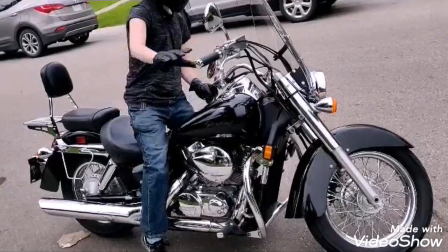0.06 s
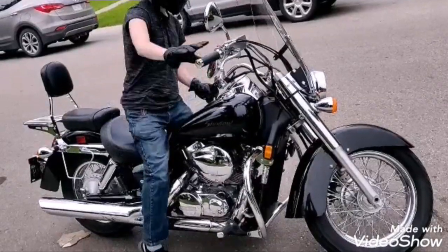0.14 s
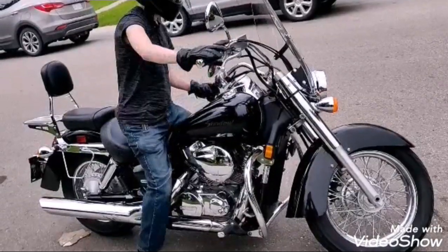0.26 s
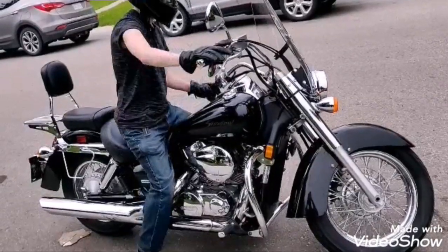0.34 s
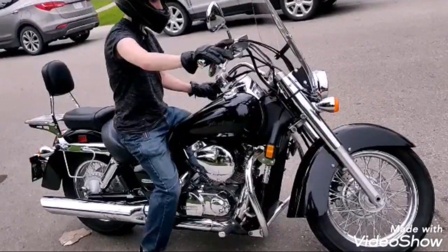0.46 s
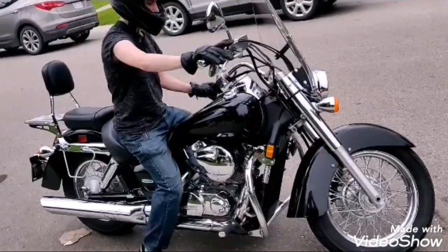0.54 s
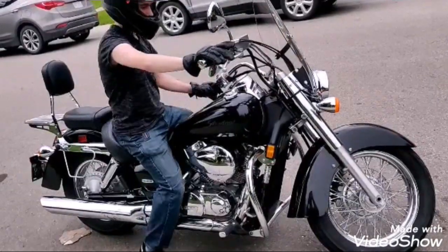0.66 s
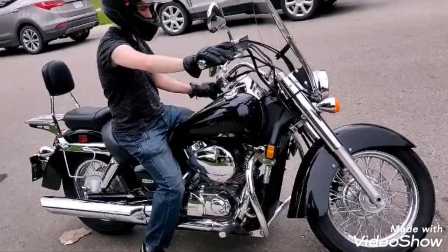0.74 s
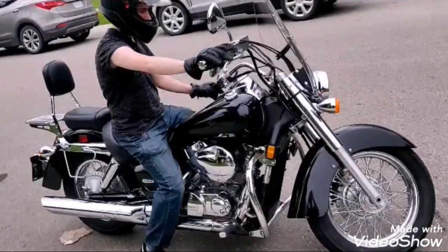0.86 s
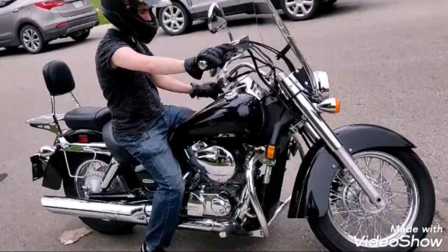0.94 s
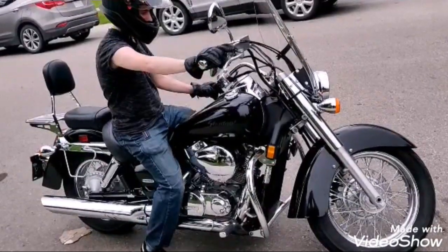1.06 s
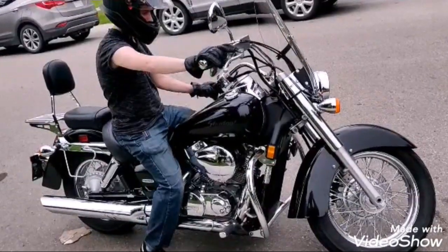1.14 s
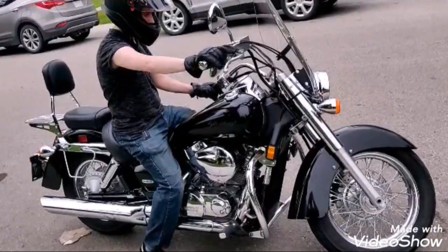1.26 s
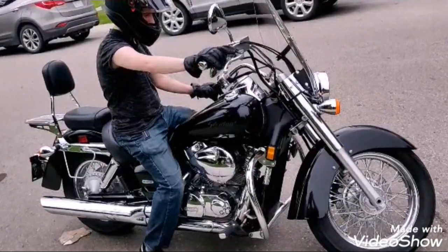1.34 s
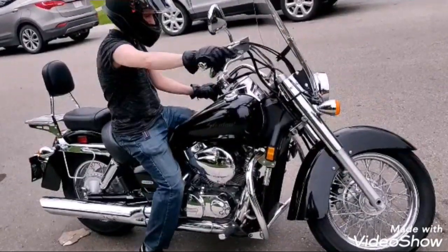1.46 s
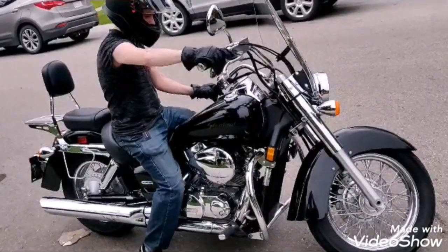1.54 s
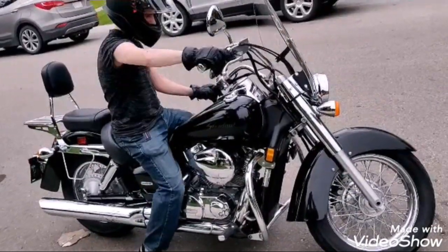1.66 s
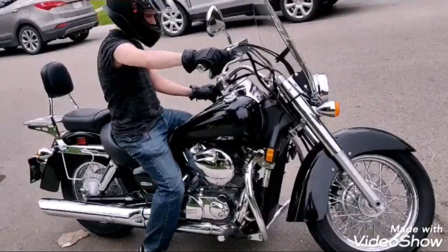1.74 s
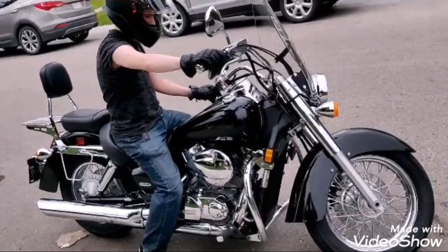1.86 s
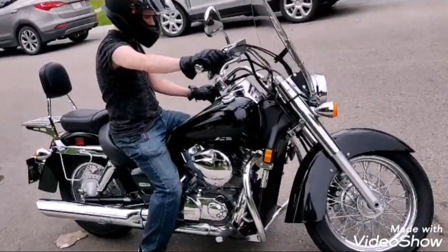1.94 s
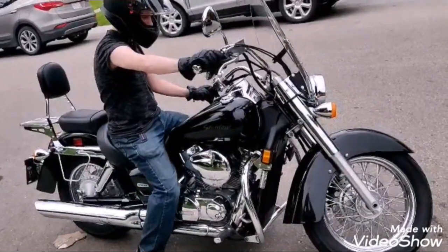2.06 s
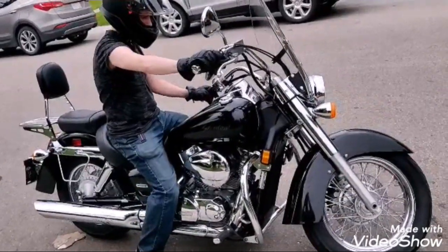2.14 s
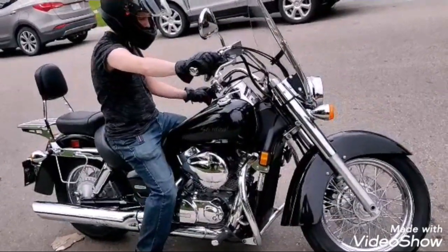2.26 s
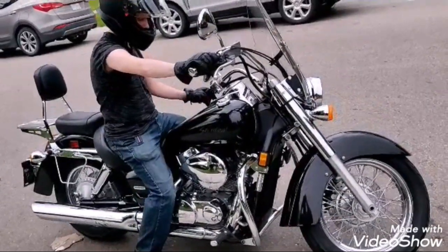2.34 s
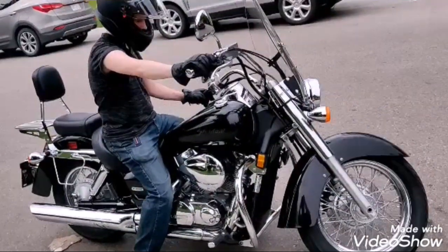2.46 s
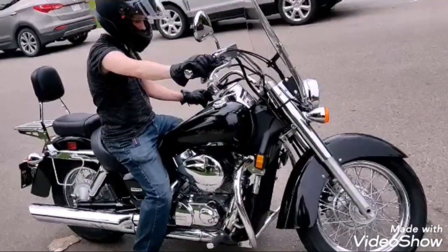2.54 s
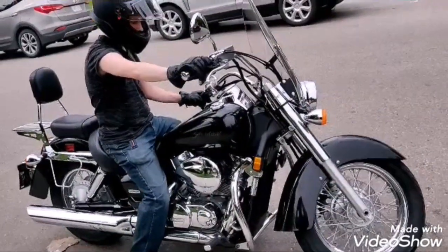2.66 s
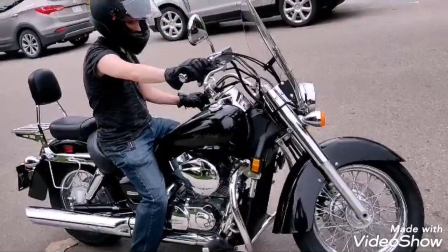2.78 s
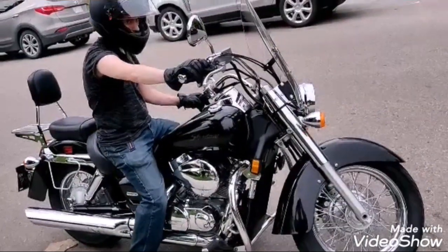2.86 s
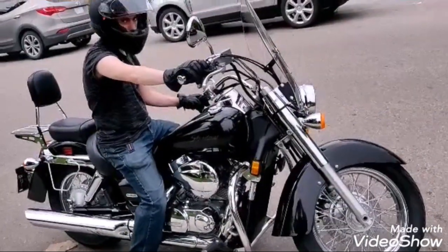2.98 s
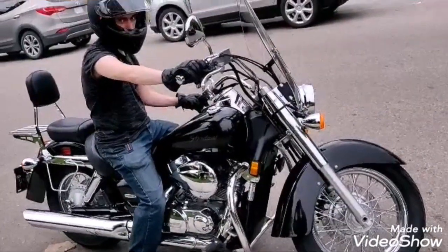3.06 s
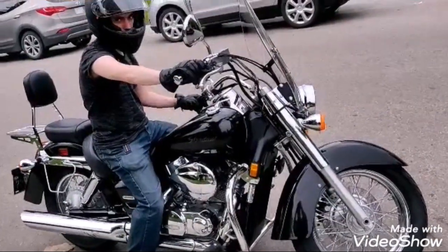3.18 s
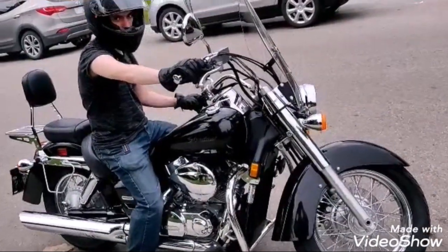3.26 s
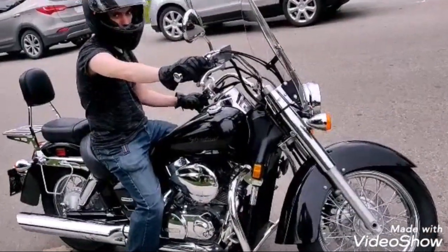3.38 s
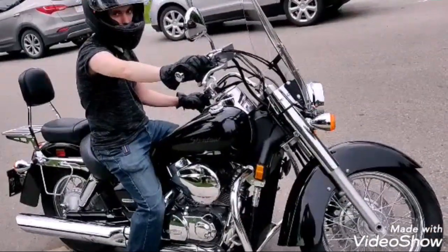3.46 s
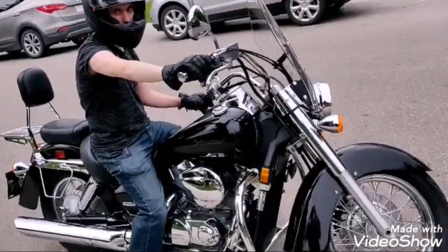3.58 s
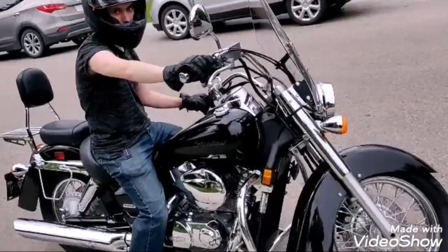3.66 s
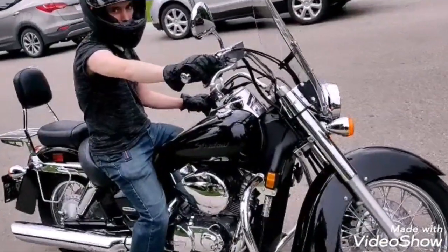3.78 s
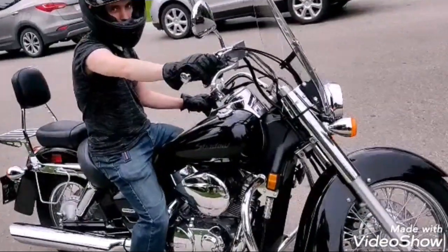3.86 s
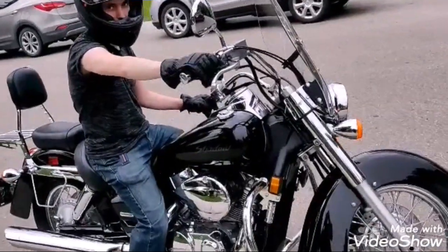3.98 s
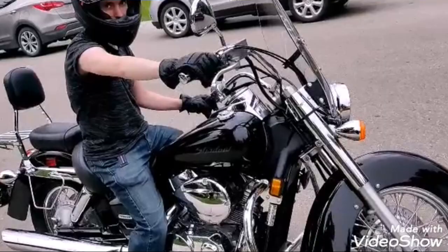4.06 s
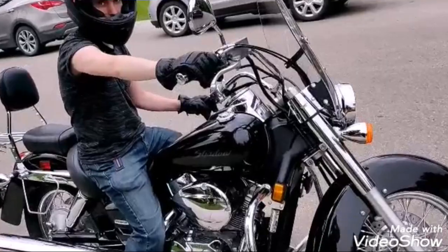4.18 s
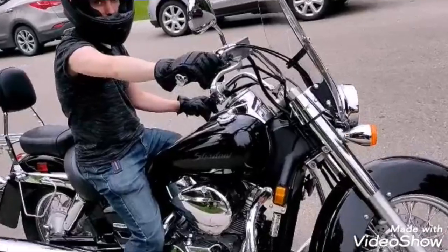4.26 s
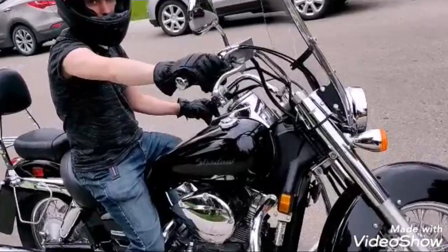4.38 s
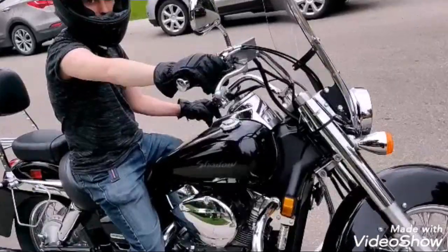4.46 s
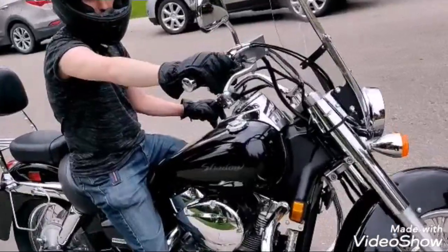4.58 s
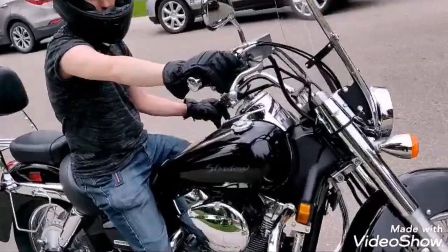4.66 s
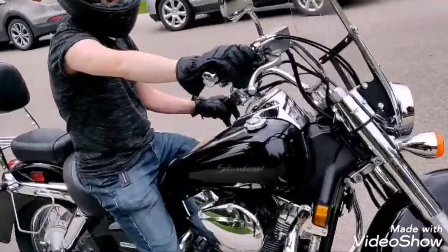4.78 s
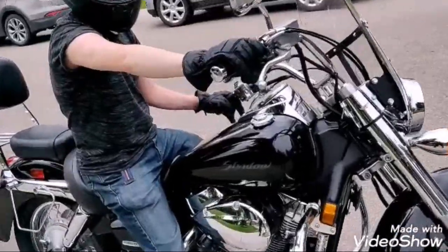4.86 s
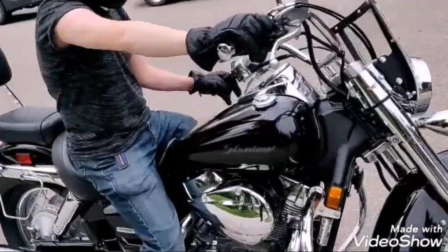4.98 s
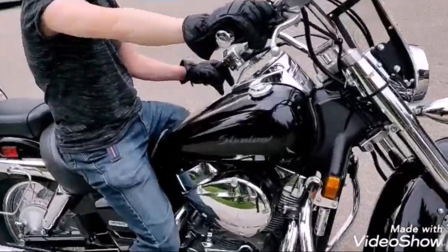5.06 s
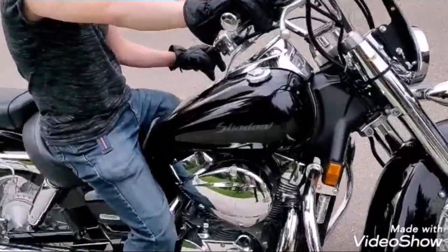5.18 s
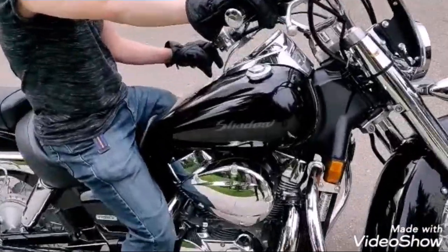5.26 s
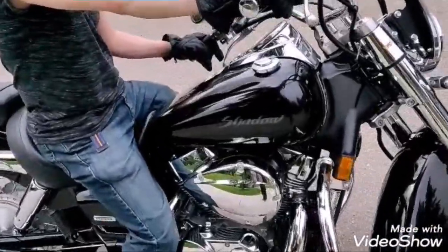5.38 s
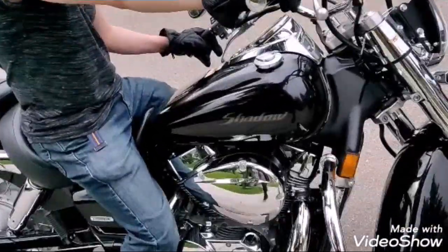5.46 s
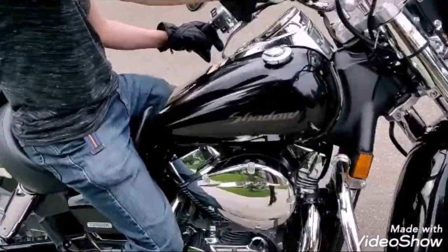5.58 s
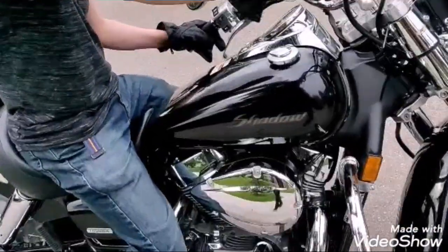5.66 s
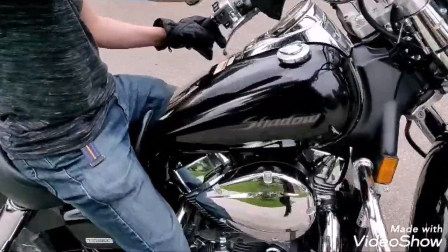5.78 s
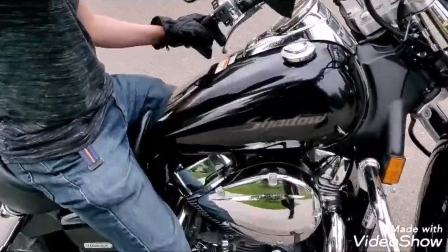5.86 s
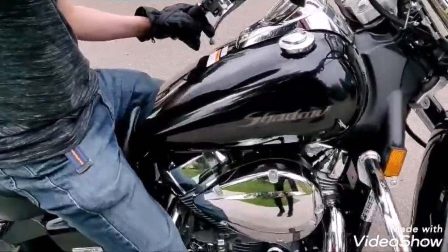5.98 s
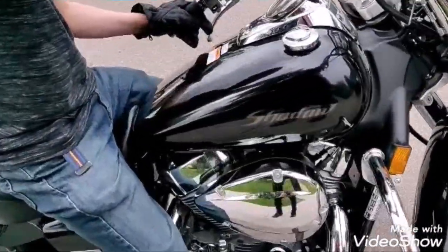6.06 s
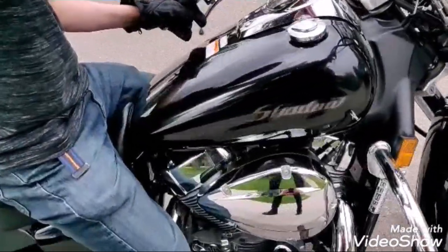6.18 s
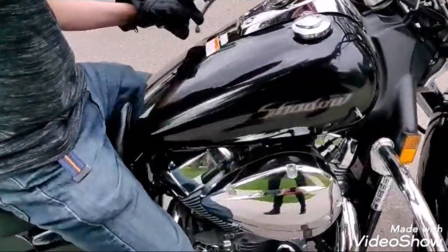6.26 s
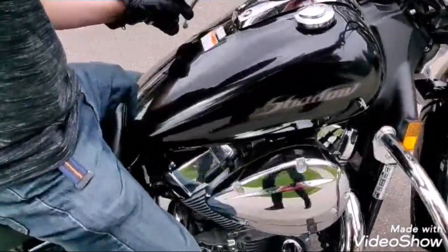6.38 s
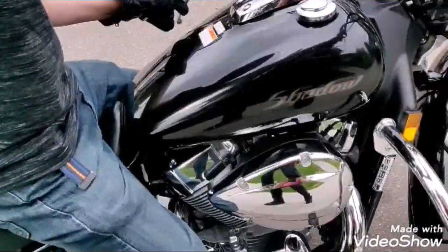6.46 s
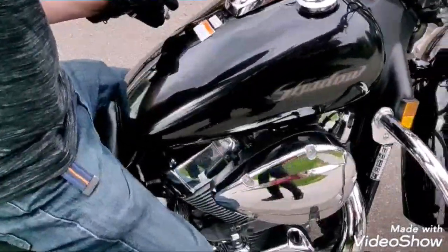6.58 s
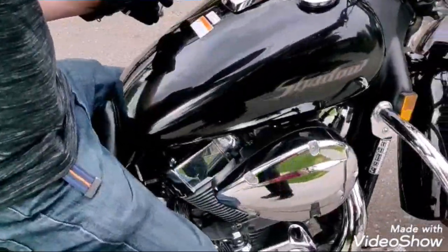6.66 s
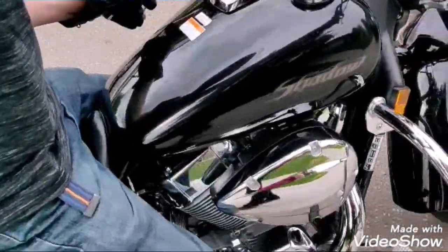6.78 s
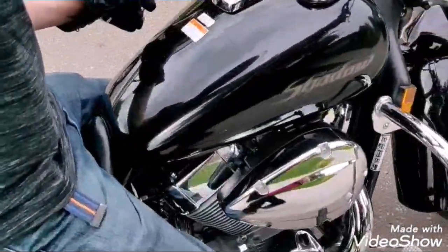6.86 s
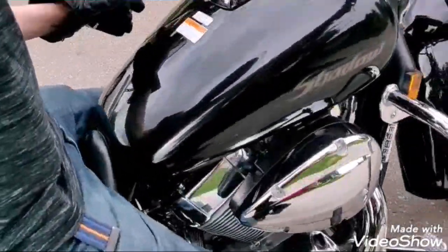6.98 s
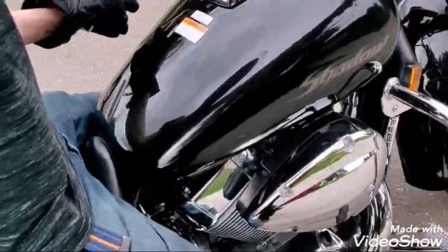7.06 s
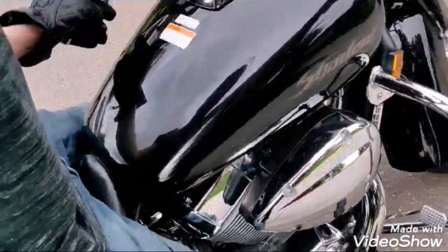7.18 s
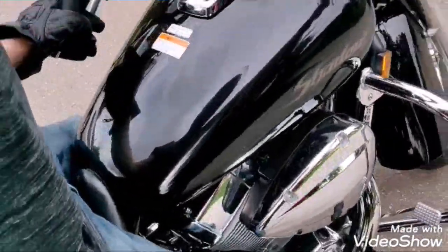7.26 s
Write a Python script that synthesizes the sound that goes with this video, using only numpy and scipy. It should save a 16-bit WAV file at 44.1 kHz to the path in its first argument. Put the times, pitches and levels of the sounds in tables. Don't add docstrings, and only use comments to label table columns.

```python
import sys
import numpy as np
from scipy import signal
from scipy.fft import rfft, irfft, next_fast_len
from scipy.io import wavfile
from scipy.ndimage import uniform_filter1d

SR = 44100
rng = np.random.default_rng(int(sys.argv[2]) if len(sys.argv) > 2 else 0)


def invert_db(x):
    u = np.asarray(x, float) / 20
    return 10 ** u


def output_pcm(signal):
    pcm = np.clip(np.atleast_2d(signal).T, -1, 1) * 32767
    wavfile.write(sys.argv[1], SR, np.round(pcm).astype(np.int16))


N = 322812


def rms_one(x):
    return x / np.sqrt(np.mean(x ** 2) + 1e-20)


def evened(x, seconds=0.12):
    size = int(seconds * SR)
    power = uniform_filter1d(uniform_filter1d(x ** 2, size=size), size=size)
    return x / np.sqrt(power + 1e-9)


def ramp(start_s, end_s):
    return np.clip((np.arange(N) / SR - start_s) / (end_s - start_s), 0, 1)


def in_time(rows):
    s, *columns = np.transpose(rows)
    t = np.arange(N) / SR
    gate = np.clip((t - s[0]) / 0.0032, 0, 1) * np.clip((s[-1] - t) / 0.004 + 1, 0, 1)
    return [gate] + [np.interp(t, s, c) for c in columns]


def drift(rate_hz):
    knots = rng.standard_normal(int(N / SR * 80))
    return np.interp(np.arange(N) / SR * min(rate_hz, 75), np.arange(len(knots)), knots)


def at_hz(points, size=N):
    hz, value = np.transpose(points)
    return np.interp(np.log(np.arange(size // 2 + 1) * SR / size + 1), np.log(hz), value)


def colour(x, spectrum):
    return rms_one(irfft(rfft(x) * invert_db(at_hz(spectrum)), N))


def resonate(x, modes):
    out = 0
    for k, (hz, width, db) in enumerate(modes):
        r = np.exp(-np.pi * max(width, 5) / SR)
        poles = [1, -2 * r * np.cos(2 * np.pi * hz / SR), r * r]
        out = out + (-1) ** k * invert_db(db) * signal.lfilter([1 - r, 0, r - 1], poles, x + 1e-18)
    return out


def grains(per_s, spread_db):
    size = invert_db(spread_db * np.minimum(rng.exponential(1, (2, N)), 5))
    size = size * (rng.random((2, N)) < per_s / SR)
    return rng.standard_normal((2, N)) * (0.61 + size)


def puffs(cycles, cycle_hz, at, width_s, scatter_db):
    turn = cycles - at + 0.5
    which = np.clip(turn.astype(int), 0, 399)
    strength = invert_db(scatter_db * rng.standard_normal(400)[which])
    return strength * np.exp(-((turn % 1 - 0.5) / cycle_hz / width_s) ** 2) * (turn > 0)


WALK_UP_S = (6.1, 6.28)
OIL_ARRIVES_S = (1.55, 2.17)


def throttle_shut():
    shut_s, opened_s, move_s = 4.02, 5.55, 0.014
    return ramp(shut_s, shut_s + move_s) - ramp(opened_s, opened_s + move_s)


def slowing_down(cycle_hz):
    slowing = uniform_filter1d(-np.gradient(cycle_hz) * SR, size=SR // 10)
    return np.clip((slowing - 9) / 12, 0, 1)


def overrun(cycle_hz):
    return slowing_down(cycle_hz) * np.clip((30 - cycle_hz) / 5, 0, 1)


# t/s, four-stroke cycle f/Hz
SPEED = [(1.3, 9.9), (1.495, 11.18), (1.779, 10.27), (2.333, 9.9), (2.755, 25.75), (2.988, 30.32),
         (3.437, 33.93), (3.904, 35.23), (4.0, 35.3), (4.12, 30.75), (4.701, 15.09), (4.94, 12.57),
         (5.392, 9.99), (5.58, 10.67), (5.926, 20.04), (6.197, 22.65), (6.726, 24.93), (7.32, 25.47)]
# exhaust opens/cycles, exhaust level/dB, intake opens/cycles, intake level/dB
CYLINDERS = [(0.092, -18, 0.42, -5.5), (0.509, -20, 0.83, -10.5)]
# t/s, clatter level/dB, single exhaust puff level/dB
EFFORT = [(1.32, -35, -7.5), (1.6, -34, -18.5), (1.87, -35.5, -18), (2.25, -37, -15.5), (2.38, -35, -8),
          (2.55, -28.5, -20.5), (3.1, -25.5, -12), (3.6, -23.5, -9), (3.98, -23.5, -1), (4.24, -28, -9),
          (4.85, -35.5, -14), (5.16, -36.5, -17), (5.45, -36, -13), (5.8, -28.5, -7.5), (6.37, -25.5, -10),
          (6.8, -26, -4), (7.32, -26.5, 0)]
# f/Hz, width/Hz, level/dB
MUFFLER = [(53, 33, 6.5), (100.8, 26, 10), (132.7, 56, 8)]
AIRBOX = [(54, 37, 4), (125, 71, 8)]
HEADERS = [(205, 46, 3.5), (355, 91, -7)]
TANK = [(416.4, 10.8, 3), (500, 97, -18)]


def engine():
    flywheel_s, cycles_at_catch = 0.15, -0.22
    running, cycle_hz = in_time(SPEED)
    cycle_hz = uniform_filter1d(cycle_hz, size=int(flywheel_s * SR), mode="nearest")
    cycles = np.cumsum(cycle_hz * running) / SR + cycles_at_catch
    gate, clatter_db, exhaust_db = in_time(EFFORT)
    shut, near = throttle_shut(), ramp(*WALK_UP_S)

    crack_db = clatter_db + 3 - 23 * shut * np.clip(cycle_hz / 10 - 1.3, 0, 1)
    crack_db += -4.5 * (1 - ramp(*OIL_ARRIVES_S)) - 7.5 * near
    tank_db = -43.5 + 1.04 * (cycle_hz - 10)
    tank_db += (-7.5 * shut - 9 * near) * np.clip(cycle_hz / 10 - 1, 0, 1)

    uneven_db = 22 / cycle_hz
    exhaust = intake = crack = 0
    for exhaust_at, out_db, intake_at, in_db in CYLINDERS:
        out_width_s, in_width_s = 0.0008 + 0.018 / cycle_hz, 0.00077 + 0.046 / cycle_hz
        exhaust = exhaust + invert_db(out_db) * puffs(cycles, cycle_hz, exhaust_at, out_width_s, uneven_db)
        crack = crack + invert_db(out_db) * puffs(cycles, cycle_hz, exhaust_at, 0.0007, 2 * uneven_db)
        intake = intake + invert_db(in_db) * puffs(cycles, cycle_hz, intake_at, in_width_s, uneven_db)

    merged_db = -1.3 * np.clip(cycle_hz - 11.5, 0, 14)
    low = evened(resonate(exhaust, MUFFLER)) + invert_db(4) * evened(resonate(intake, AIRBOX))
    shaking = rng.standard_normal(N) * (1.05 + np.cos(2 * np.pi * (cycles - 0.4)))
    turbulence = 0.13 * rng.standard_normal(N) * (1 + 2 * intake + 2 * exhaust)

    tone = invert_db(exhaust_db - 9 + merged_db - 22 * overrun(cycle_hz)) * low
    tone += invert_db(crack_db - 5 + 0.37 * merged_db) * evened(resonate(crack + turbulence, HEADERS))
    tank_db += 1.5 + 0.66 * merged_db - 1.1 * np.clip(cycle_hz - 28, 0, 6)
    tone += invert_db(tank_db) * evened(resonate(shaking, TANK))
    tone += orders(cycles, cycle_hz)
    tone += overrun_pops(cycles, cycle_hz) + thumps(cycles, cycle_hz) + barks()
    pulsing = 1 + 0.51 * (exhaust + 1.24 * intake)
    return gate * (tone + running_gear(clatter_db, near, pulsing, intake))


def interference(order, hz, waves, pipes):
    total = 1
    for at, lag_s, db, tilt_db in waves:
        turn = np.exp(-2j * np.pi * (order * at + hz * lag_s))
        total = total + invert_db(db + tilt_db * np.log2(hz / 100)) * turn
    knots, db = np.transpose(pipes)
    return np.abs(total) * invert_db(np.interp(np.log(hz), np.log(knots), db))


# crank position/cycles, path delay/s, level at 100 Hz/dB, tilt/dB per octave
WAVES_OPEN = [(0.462, -0.00072, -15.5, 15.2), (0.872, -0.00186, -2.7, -2.6), (0.415, -3e-05, -15.3, 17.0)]
WAVES_SHUT = [(0.41, -0.00025, -3.2, -4.3), (0.061, -0.00148, -1.4, 1.6), (0.08, -0.00887, -3.8, -3.0)]
# f/Hz, level/dB
PIPES_OPEN = [(20, -61), (30, -35.5), (59, -23.5), (87, -25.5), (114, -22), (177, -35), (349, -50),
              (560, -82.5)]
PIPES_SHUT = [(20, -44), (53, -23.5), (69, -24), (92, -19), (102, -20.5), (166, -31.5), (184, -27),
              (560, -47)]
# f/Hz, half width/Hz, level/dB
BOOMS = [(281.1, 3.8, 16.5), (412, 6.3, 17)]
# f/Hz, width/Hz, level/dB
PANELS = [(405, 14, 7.5), (530, 12, 5.5), (637, 14, 1), (723, 24, 5.5)]
# order, level afar/dB, level close by/dB, level on shut throttle/dB, extra level speeding up/dB
ORDER_TRIM = [(1, -9, -27, -6, 0), (2, 8.5, 9.5, -12, 0), (3, 8.5, 15.5, 3.5, -0.5), (4, -5, -8.5, -2, 0),
              (5, 3, 3.5, 1, 1), (6, -1, 1, -4.5, 3.5), (7, -2.5, -5.5, -1.5, 3.5), (8, -2, -6, 2, -6),
              (9, -4, -1, -2, 5), (10, 3, -8, -2, -6), (11, -3, -5.5, -5, -4), (12, 2.5, 4, -1, 1.5)]
UPPER_ORDERS = [(13, -41, -32.5, -38, 4.5), (14, -49.5, -31.5, -31, 1), (15, -39.5, -40.5, -44, 0.5),
                (16, -41, -43, -41, -9.5), (17, -43.5, -40.5, -52, 3.5), (18, -45.5, -48.5, -41, 4),
                (19, -43, -38, -45, -7), (20, -47.5, -45.5, -40, -3), (21, -43, -51.5, -46, -8.5),
                (22, -46, -62, -38.5, 1.5)]


def orders(cycles, cycle_hz):
    coarse = np.arange(0, N, 128)
    speed, shut, near = cycle_hz[coarse], throttle_shut()[coarse], ramp(*WALK_UP_S)[coarse]
    speeding = np.clip(np.gradient(speed) * SR / 128 / 22, 0, 1)
    hidden_db = -7 * ramp(6.92, 7.14)[coarse]
    apart = 1 - 0.93 * overrun(cycle_hz)[coarse] ** 2
    firings = np.array(CYLINDERS)[:, 0] - 0.08
    out = 0
    for order, far_db, near_db, shut_db, pull_db in ORDER_TRIM + UPPER_ORDERS:
        order = round(order)
        hz = order * speed
        shadow_db = hidden_db * np.exp(-((hz - 321) / 29) ** 2)
        pulling = invert_db(far_db + near * (near_db - far_db) + pull_db * speeding + shadow_db)
        coasting = invert_db(shut_db)
        if order <= len(ORDER_TRIM):
            boom = 1
            for centre_hz, width, db in BOOMS:
                boom = boom + invert_db(db + 5 * (speed - 35.1)) / (1 + ((hz - centre_hz) / width) ** 2)
            pulling = pulling * boom * interference(order, hz, WAVES_OPEN, PIPES_OPEN)
            after_db = 11 * (order == 8) * np.clip((speed - 31.7) / (33.6 - 31.7), 0, 1)
            coasting = coasting * invert_db(after_db) * interference(order, hz, WAVES_SHUT, PIPES_SHUT)
        else:
            lift_db = sum(db * np.exp(-((hz - centre_hz) / width) ** 2) for centre_hz, width, db in PANELS)
            pulling = pulling * invert_db((1 - near) * lift_db)
        ragged = invert_db(-1.5 * np.clip(order - 7, 0, 5) * np.clip((30 - speed) / 10, 0, 1))
        wander = np.clip(drift(8)[coarse], -1.5, 1.5) * order / 12
        size = ((1 - shut) * pulling + shut * ragged * coasting * apart) * invert_db(3 + wander)
        size = np.interp(np.arange(N), coarse, size)
        phase = np.angle(np.exp(-2j * np.pi * order * firings).sum())
        phase = phase + np.interp(np.arange(N), coarse, 0.15 * wander)
        out = out + size * np.cos(2 * np.pi * order * cycles + phase)
    return np.clip((cycle_hz - 11.5) / 5.3, 0, 1) * out


# f/Hz, width/Hz, level/dB
TAILPIPE = [(235, 110, -0.5), (760, 150, -11), (1135, 84, -16), (2280, 59, -0.5)]


def overrun_pops(cycles, cycle_hz):
    popping = slowing_down(cycle_hz) * np.clip((34 - cycle_hz) / 9, 0, 1)
    snaps = sum(puffs(cycles, cycle_hz, at + 0.001 * cycle_hz, 0.00017, 3) for at in (0.15, 0.54))
    return -invert_db(-30) * popping * evened(resonate(snaps, TAILPIPE), seconds=0.18)


# f/Hz, width/Hz, level/dB
THUMP_RING = [(100, 22, 1.5), (150, 60, 6.3)]


def thumps(cycles, cycle_hz):
    lead_s, swell_s = 0.003, 0.003
    swell = 0
    for at, db in ((0.15, 0.7), (0.54, -0.7)):
        swell = swell + invert_db(db) * puffs(cycles, cycle_hz, at - lead_s * cycle_hz, swell_s, 0.8)
    ring = sum(resonate(swell, [mode]) for mode in THUMP_RING)
    swell = swell - uniform_filter1d(swell, size=SR // 10)
    return overrun(cycle_hz) * invert_db(-0.8 + 0.9) * (invert_db(-9.4) * swell - ring)


# t/s, level/dB
HARD_FIRINGS = [(1.328, -18.5), (1.379, -12), (1.428, -20), (2.421, -12.5), (2.459, -17), (2.492, -14),
                (2.521, -18), (2.55, -6.5), (2.6, -7), (5.665, -27), (5.745, -12), (5.794, -24)]
# f/Hz, width/Hz, level/dB
BARK = [(226, 97, 0), (333, 210, -4.5), (700, 290, -12.5), (1500, 900, -32)]


def barks():
    clicks = np.zeros(N)
    for s, db in HARD_FIRINGS:
        clicks[int(s * SR)] = 60 * invert_db(db)
    return resonate(clicks, BARK)


# f/Hz, level/dB per Hz
VALVE_GEAR = [(1470, -13), (2500, -8), (2690, -5.5), (2930, -7), (3190, -4.5), (3910, -5), (5200, -0.5),
              (5800, 1), (6400, 3), (7470, -7), (8970, -12), (10800, -45.5), (14000, -70), (22000, -120)]
CASES = [(260, -12.5), (450, -7.5), (739, -7), (887, -9.5), (1080, -6.5), (1430, -8.5), (1700, -10),
         (2920, -16.5), (3600, -23), (4680, -20), (7920, -120)]
# f/Hz, width/Hz, level afar/dB, level close by/dB
CASE_RINGS = [(783, 84, 1, -8), (1015, 22, -6.5, -3.5), (1122, 49, -1.5, -2), (1326, 28, -4.5, -26),
              (1600, 59, -7.5, -3), (1900, 41, -1, 1), (2100, 94, 0, 4.5), (2243, 41, -11, -22),
              (2473, 5, -19, -3), (2870, 35, -6, -40)]


def running_gear(clatter_db, near, pulsing, valve_lift):
    gear_db = clatter_db + 6.5 * (1 - ramp(*OIL_ARRIVES_S))
    cases_db = clatter_db - 0.5 + 6 * near ** 2
    cases_db = cases_db - 0.8 * np.clip(clatter_db + 29, 0, 5) * (1 - near)
    rings_db = clatter_db - 5.5 + 3 * near
    gear = invert_db(gear_db + 0.78 * drift(14)) * colour(grains(2500, 0.97) * pulsing, VALVE_GEAR)
    cases_level = invert_db(cases_db - 3.5 - 4.2 * near + 1.15 * drift(12))
    cases = cases_level * colour(grains(1500, 2.9) * pulsing ** 0.3, CASES)
    knocks = grains(1500, 2.5) * (1 + 2.5 * valve_lift)
    rings = 0
    for hz, width, far_db, near_db in CASE_RINGS:
        db = far_db + near * (near_db - far_db) + 2 * drift(5.9)
        rings = rings + invert_db(db) * rms_one(resonate(knocks, [(hz, width, 0)]))
    beside_airbox = ramp(6.75, 7)
    rasp = rms_one(resonate(knocks * valve_lift, [(782, 91, 5), (970, 76, -14)]))
    fin_taps = invert_db(clatter_db) * fins(knocks * (0.3 + valve_lift))
    return gear + cases + fin_taps + invert_db(rings_db - 9.5) * rings + invert_db(-30.5) * beside_airbox * rasp


# f/Hz, width/Hz, faces it at t/s, for/s, level over clatter/dB
FINS = [(2450, 58, 3.52, 0.51, -11.5), (2830, 71, 3.64, .5, -15.5), (2190, 73, 4.5, 0.5, -13),
        (2150, 60, 5.75, 0.08, -13), (1720, 51, 3.4, 0.49, -12.5), (1142, 48, 5.42, 0.68, -4),
        (1600, 36, 5.56, 0.5, -11), (2490, 36, 6.95, .1, -10), (985, 35, 7.4, .06, -11),
        (1520, 70, 5.7, .15, -8), (1140, 60, 5.74, 0.064, -10), (1850, 50, 7.1, .25, -15),
        (1580, 55, 6.05, 0.13, -7.5), (2010, 58, 6.1, 0.14, -13), (2020, 92, 6.28, 0.19, -18),
        (2220, 110, 7.24, 0.35, -15)]


def fins(knocks):
    t = np.arange(N) / SR
    out = 0
    for hz, width, s, span_s, db in FINS:
        facing = np.exp(-((t - s) / span_s) ** 2)
        out = out + invert_db(db) * facing * evened(resonate(knocks, [(hz, width, 0)]))
    return out


# t/s, peak level/dB
GULPS = [(2.388, -18.5), (2.4194, -18.5), (2.4613, -14), (2.5277, -16.5), (2.5805, -14.5), (2.6294, -17),
         (2.7172, -13.5), (5.6635, -22), (5.69, -16), (5.7344, -17), (5.8022, -13.5), (5.8576, -19),
         (5.9075, -19), (6.3764, -18)]
# f/Hz, width/Hz, level/dB
GULP_RINGS = [(5530, 500, -1), (6180, 720, 2), (4300, 200, -5)]


def gulps():
    t = np.arange(N) / SR
    shape = 0
    for s, db in GULPS:
        fade = np.exp(-np.clip(t - s, 0, 1) / 0.012)
        shape = shape + invert_db(db - 6.5) * ramp(s - 0.001, s + 0.0022) * fade
    return shape * rms_one(resonate(rng.standard_normal((2, N)), GULP_RINGS))


# f/Hz, level/dB per Hz
GRIND = [(1180, -30.5), (2000, -7.5), (2320, -21), (3510, -12.5), (4100, -5.5), (6490, -4), (7630, -10),
         (9170, -14), (10800, -43), (14000, -67), (22000, -120)]
GROWL = [(110, -47), (180, -20), (258, -11), (532, -26), (736, -5.5), (1040, -11.5), (1330, 1), (1480, -12),
         (1910, -15), (3200, -10.5), (4160, -44), (7040, -120)]
# t/s, level/dB
WHINE = [
    (0.97, -36),
    (1.014, -37.5),
    (1.806, -41),
    (2.3, -59),
]
# t/s, peak level/dB
SOLENOID = [
    (0.971, -19.5),
    (1.33, -30),
    (1.381, -23),
    (1.431, -28),
]


def starter():
    t = np.arange(N) / SR
    grinding, growling = cranking()
    chatter_db = 3 * np.cos(2 * np.pi * 50 * (t - 1.128))
    teeth = grains(1500, 3) * invert_db(chatter_db)
    rings = gear_song(teeth)
    grind = rms_one(colour(teeth, GRIND) + invert_db(-1.5 + 2 * drift(16.15)) * rings)
    growl = rms_one(colour(teeth, GROWL) + 0.58 * rings)
    whine_gate, whine_db = in_time(WHINE)
    whine = rms_one(resonate(grains(890, 4.8), [(1720, 50, -8), (1930, 54, 5.5), (4400, 440, -2)]))
    hits = 0
    for s, db in SOLENOID:
        hits = hits + invert_db(db) * ramp(s - 0.002, s + 0.0023) * np.exp(-np.abs(t - s) / 0.0087)
    clack = hits * (colour(teeth, VALVE_GEAR) + 0.48 * colour(teeth, GROWL))
    cranked = invert_db(-4.5) * (grinding * grind + growling * growl)
    return cranked + whine_gate * invert_db(whine_db + 5.5) * whine + 0.66 * clack


# t/s, length/s, grind level/dB, growl over grind level/dB
STRAINS = [
    (1.014, 0.049, -22, 0.5),
    (1.118, 0.066, -15.5, -6.5),
    (1.213, 0.014, -17.5, -10.5),
    (1.249, 0.04, -14, -8),
]


def cranking():
    on_s, off_s, attack_s, release_s = 0.99, 1.39, 0.0028, 0.017
    let_go = ramp(1.318, off_s)
    engaged = ramp(on_s, on_s + 0.0024) - ramp(off_s, off_s + 0.0037)
    grind = invert_db(-25 - 12 * let_go) * engaged
    growl = grind * invert_db(-4 - 22 * let_go)
    for s, length, grind_db, growl_db in STRAINS:
        surge = ramp(s - attack_s, s) - ramp(s + length, s + length + release_s)
        surge = invert_db(grind_db) * surge
        grind, growl = np.maximum(grind, surge), np.maximum(growl, surge * invert_db(growl_db))
    return grind, growl


# f/Hz, width/Hz, level/dB
STRAIN_RINGS = [
    [(786, 57, -5), (1320, 40, -4), (1940, 55, 2.5), (4030, 29, 4.5), (4670, 45, -6.5), (6040, 120, 2.5),
     (6540, 120, 2.5)],
    [(1320, 41, -3.5), (4130, 93, -0.5), (5580, 39, -13), (6020, 120, -1), (6660, 28, 5), (8200, 50, -6.5),
     (8920, 34, -21)],
    [(1970, 19, -7), (3700, 31, -2), (4600, 110, -14), (5100, 47, -5), (6340, 49, 0), (7700, 47, -14),
     (8420, 21, -16)],
    [(1604, 46, -7.5), (1870, 39, -9), (2910, 99, -12), (4450, 40, -11), (5600, 35, -11), (6170, 23, 2.5),
     (6280, 63, -0.5)],
]


def gear_song(teeth):
    starts_s = [0.9] + [row[0] - 0.01 for row in STRAINS[1:]] + [1.5]
    edges = [int(SR * s) for s in starts_s]
    out = np.zeros((2, N))
    for start, end, modes in zip(edges, edges[1:], STRAIN_RINGS):
        out[:, start:end] = rms_one(resonate(teeth[:, start:end], modes))
    return out


# t/s, hiss level/dB, low part level/dB
RUSTLE = [(0.0, -65, -51), (0.3, -52.5, -52.5), (0.41, -48.5, -53), (0.45, -60, -48), (0.598, -59, -51),
          (0.7, -59, -70), (0.74, -68, -85), (0.96, -71, -64)]
# t/s, length/s, f/Hz, level/dB
SEAT_SQUEAKS = [
    (0.3, 0.047, 800, -50.5),
    (0.41, 0.0082, 1300, -56),
    (.5, .06, 1850, -58),
    (0.56, 0.031, 620, -58),
]
# t/s, peak level/dB, f/Hz, time to fall 60 dB/s, low part level/dB
CREAKS = [(0.0538, -44, 6300, .04, -9), (0.2513, -43, 5010, .03, -15), (0.2678, -35, 6040, .025, -13),
          (0.289, -39, 3580, .03, -12), (0.3092, -30, 6180, .018, -20), (0.3147, -25, 5980, .025, -17),
          (0.3561, -38, 3000, .04, -2), (0.5387, -29, 6120, .02, -10), (0.615, -44, 6150, .03, -16),
          (0.629, -42, 6300, .035, -19), (0.6584, -46, 6190, .03, -18), (0.6928, -46, 6100, .03, -17),
          (0.7642, -53, 4440, .02, -16), (0.7801, -28, 6100, .02, -27)]


def rider():
    t = np.arange(N) / SR
    bright, dull = colour(grains(800, 4), VALVE_GEAR), colour(grains(900, 3), CASES)
    gate, hiss_db, low_db = in_time(RUSTLE)
    out = gate * (invert_db(hiss_db + 3) * bright + invert_db(low_db - 4.5) * dull)
    for s, length, hz, db in SEAT_SQUEAKS:
        shape = ramp(s, s + 0.004) - ramp(s + length, s + length + 0.008)
        out += invert_db(db) * shape * rms_one(resonate(dull, [(hz, 70, 0)]))
    for s, peak_db, hz, t60, low_part_db in CREAKS:
        now = slice(int(s * SR), int(s * SR) + 4096)
        tick = rms_one(bright[:, now] + 2.7 * resonate(bright[:, now], [(hz, 900, 0)]))
        fade = invert_db(peak_db - 3 - 60 * t[:now.stop - now.start] / t60)
        out[:, now] += fade * (tick + invert_db(low_part_db) * dull[:, now])
    return out


CAR_CYLINDERS_DB = [4.1, 7.9, 5.6, 2.6]
# f/Hz, width/Hz, level/dB
CAR_PIPE = [(46.3, 23, -7.5), (98, 28, -8.5)]


def idling_car():
    cycle_hz, first_s = 25.03 / 4, 0.0273
    cycles = (np.arange(N) / SR - first_s) * cycle_hz + 1
    firings = 0
    for k, db in enumerate(CAR_CYLINDERS_DB):
        firings = firings + invert_db(db) * puffs(cycles, cycle_hz, k / 4, 0.0044, 3.6)
    return invert_db(-32) * rms_one(resonate(firings, CAR_PIPE))


# f/Hz, level/dB per Hz
STREET = [(71, -12.5), (120, 1.5), (181, -15.5), (244, -12.5), (295, -17.5), (1200, -31), (2730, -38.5),
          (6220, -42), (7090, -45), (9040, -44), (10500, -57), (13600, -88), (22000, -120)]


def street():
    return invert_db(-46 + 13.3 * drift(0.56)) * colour(rng.standard_normal((2, N)), STREET)


# f/Hz, level/dB
LEFT_OVER_RIGHT = [(60, 3.5), (110, 4.5), (190, 4.5), (330, 3), (590, 3.5), (1050, 3.5), (1860, 6),
                   (3290, 0.5), (5830, 8.5), (10300, -14)]
# f/Hz, likeness/0-1
LIKENESS = [(100, .99), (350, .97), (700, .84), (1400, .62), (2800, .47), (5600, .38), (9000, .3)]


def two_ports(pair):
    right_lead_s, close_lead_s = -0.00024, -0.0005
    size = next_fast_len(N + 8192)
    first, second = rfft(pair, size)
    alike = np.clip(at_hz(LIKENESS, size=size), 0, 1)
    tilt = invert_db(at_hz(LEFT_OVER_RIGHT, size=size) / 2)
    hz = np.arange(size // 2 + 1) * SR / size
    own = np.sqrt(1 - alike ** 2) * second
    lead = np.exp(2j * np.pi * right_lead_s * hz / (1 + (hz / 2200) ** 2))
    right = alike * lead * first + own
    treble = 1 / (1 + (1200 / (hz + 1)) ** 4)
    turned = alike * np.exp(1j * np.pi * close_lead_s * hz * (1 + treble)) * first + own
    left, right, turned = irfft([first * tilt, right / tilt, turned / tilt], size)[:, :N]
    return np.array([left, right + ramp(4.6, 5.4) * (turned - right)])


def scene():
    background = street()
    motorcycle = engine() + gulps() + starter()
    return invert_db(1.5) * two_ports(motorcycle + rider() + idling_car() + background)


def low_pass(x):
    return signal.sosfilt(signal.butter(12, 10930, fs=SR, output="sos"), x)


def record(dry):
    x = signal.sosfilt(signal.butter(2, 28, "high", fs=SR, output="sos"), dry)
    x = signal.sosfilt(signal.butter(8, 10000, fs=SR, output="sos"), x)
    mix = 0.91 * np.tanh(x / 1.042)
    return low_pass(mix)


dry = scene()
out = record(dry)
output_pcm(out)
```